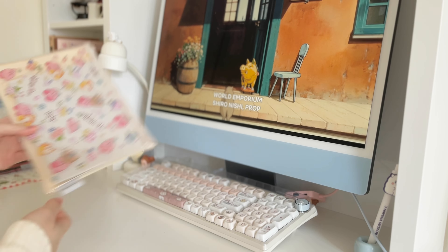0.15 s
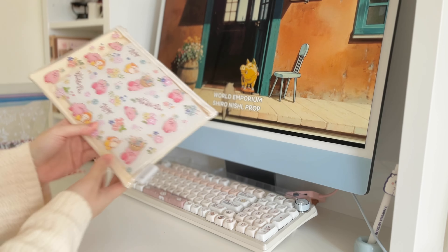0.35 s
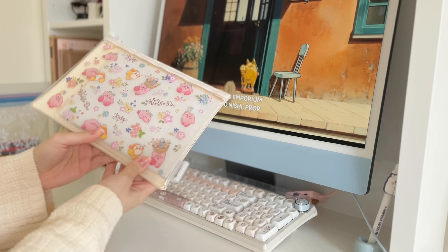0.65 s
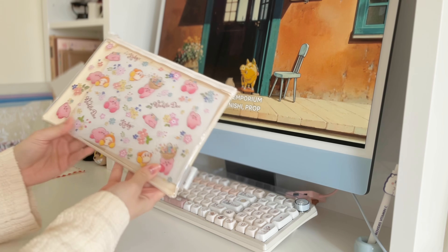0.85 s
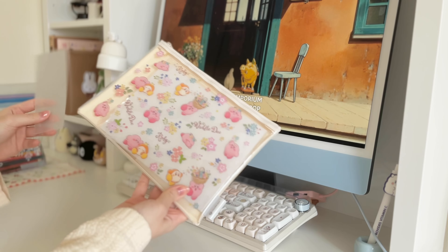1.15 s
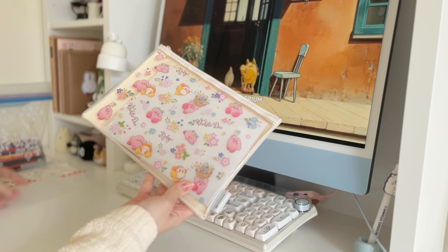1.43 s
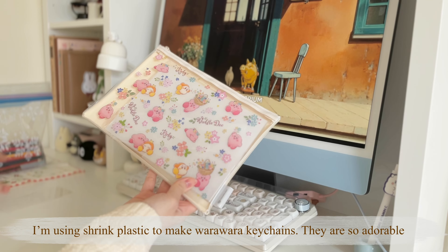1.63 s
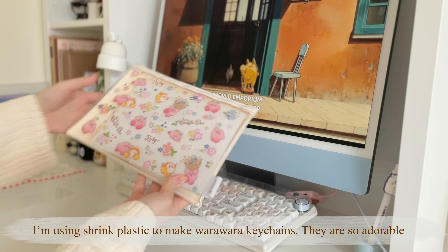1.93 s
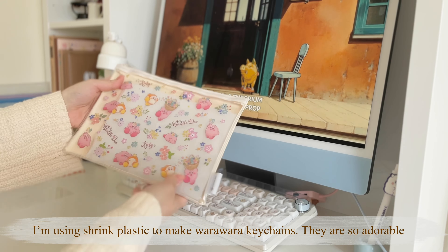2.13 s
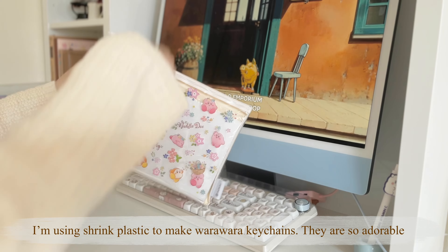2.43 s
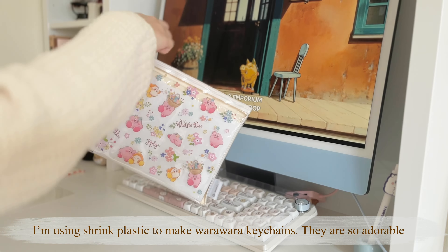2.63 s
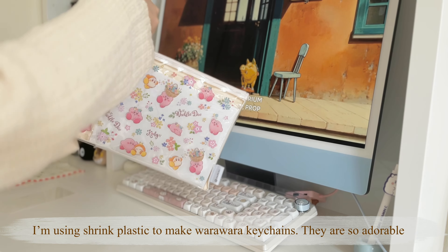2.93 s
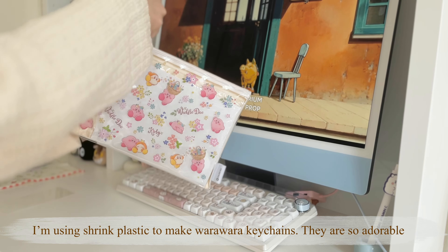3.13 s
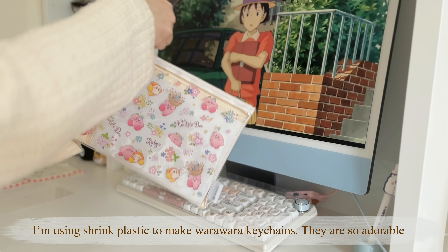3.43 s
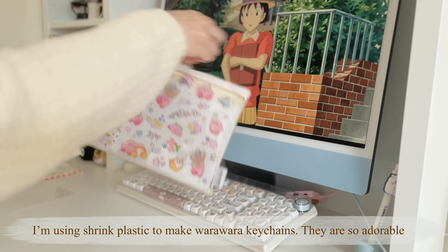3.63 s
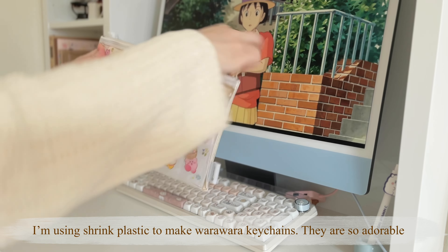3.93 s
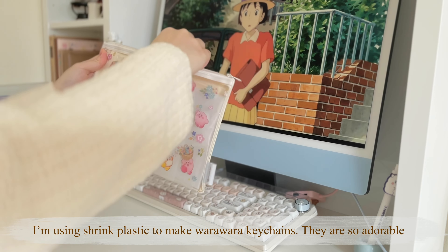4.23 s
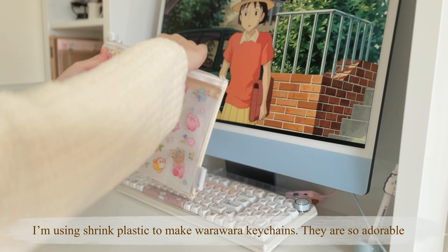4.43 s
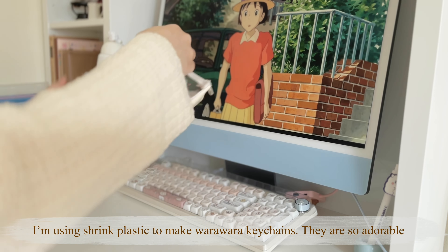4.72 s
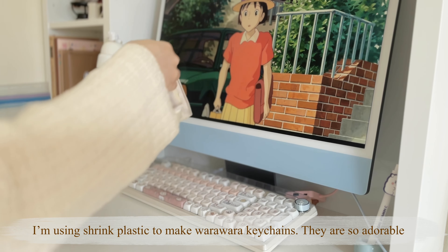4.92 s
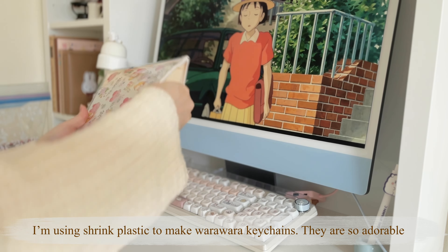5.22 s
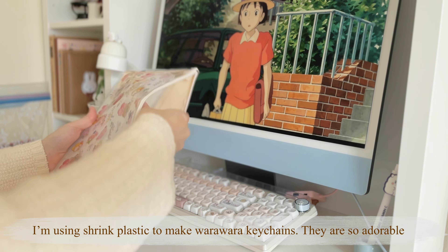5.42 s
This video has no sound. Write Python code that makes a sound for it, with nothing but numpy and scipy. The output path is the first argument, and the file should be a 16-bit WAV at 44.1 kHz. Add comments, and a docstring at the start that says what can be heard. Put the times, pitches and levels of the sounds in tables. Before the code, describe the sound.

A thin plastic zip pouch is handled close to the microphones in a small room with a faint low rumble and electrical hum. For the first second it rustles softly, with scattered crackles and light taps. At about 1.5 seconds a sharp crinkle and snap coincide with the dull knock of a card being put down. More crackling follows around 2 seconds, and at 2.4 a hollow thump, among the loudest sounds, rings briefly through the desk. Things go quieter, and the zip tab ticks near 3 seconds. From 3.3 to 3.8 the zip is pulled open, its rasping clicks speeding up into a short whine. From about 3.9 seconds the pouch is spread and a hand rummages inside, making irregular crinkles, small snaps, sliding hiss and soft dull knocks, busiest between 4.5 and 5.1. A last crisp crinkle comes at 5.5 seconds.

```python
"""A thin plastic zip pouch is handled: its film flexes, crinkles, slides and snaps as creases buckle.
The zip is pulled open, its tooth clicks fusing into a whine; the tab ticks and a hand rummages inside.
A card is put down with a dull knock, and a thump excites the modes of the desk.
A small room reverberates over faint rumble and mains hum; a close pair of microphone ports listens."""
import sys
import numpy as np
from scipy import signal
from scipy.fft import rfft, irfft, next_fast_len
from scipy.io import wavfile
from scipy.ndimage import map_coordinates

SR = 44100
rng = np.random.default_rng(int(sys.argv[2]) if len(sys.argv) > 2 else 0)


def unload_wav(signal):
    """Save mono or channel-first audio to the path in sys.argv[1] as 16-bit WAV at rate SR, clipped to [-1, 1]."""
    wavfile.write(
        sys.argv[1],
        SR,
        np.round(np.clip(np.atleast_2d(signal).T, -1, 1) * 32767).astype(np.int16),
    )


N = 245637
TOP_HZ = 15800  # band limit


def film(flex_db=-2, crinkle_db=-3.5, slide_db=-1, held_db=-104, clumps_per_s=70, clump_db=3):
    """Buckling and friction: bent film flexes dully and crinkles in clumps; sliding faces hiss."""
    # one face slides over another: (start [s], swell [s], hold [s], level [dB])
    slides = [(0.0, 0.005, 0.22, -79.5), (0.375, 0.1, .04, -73.5), (0.55, 0.082, 0.35, -60),
              (0.766, 0.021, 0.0072, -57.5), (0.983, 0.0086, 0.016, -50.5), (1.126, 0.018, 0.075, -74.5),
              (1.255, 0.028, 0.11, -82), (1.435, 0.02, 0.008, -53), (1.465, 0.004, 0.025, -52.5),
              (1.503, 0.0086, 0.045, -60.5), (1.986, 0.075, 0.098, -57.5), (2.617, 0.038, 0.13, -80),
              (2.78, 0.0037, 0.0055, -74), (2.993, .015, 0.0057, -75), (3.905, .008, 0.029, -69),
              (3.996, 0.011, 0.0071, -67), (4.033, .02, 0.057, -89), (4.212, .02, 0.087, -71),
              (4.472, 0.012, 0.054, -63.5), (4.586, .03, 0.13, -63), (4.926, 0.022, 0.049, -60),
              (5.05, 0.019, 0.067, -61.5), (5.266, 0.15, 0.077, -66.5), (5.505, 0.085, 0.0061, -45.5)]
    # spectra of the three sounds: (frequency [Hz], spectral density [dB])
    flex_spectrum = [(70, -40), (170, -2), (400, -9), (750, 0), (1200, 6), (1800, 6), (3500, -37)]
    crinkle_spectrum = [(500, -57), (1100, -19.5), (1800, 7.5), (2800, 10), (4000, 7), (5500, 7), (7000, 9),
                        (9000, -20), (13500, -7.5), (15800, -16.5)]
    slide_spectrum = [(2000, -1.5), (5000, 7.5), (7500, 4), (10000, 7), (12500, 9.5), (14000, 7.5),
                      (15800, -17)]
    crinkle, flex = bending() + amp(held_db)
    clumps = unit(amp(clump_db * wobble(clumps_per_s)))
    slide = sum(amp(db) * stroke(s, swell, hold, fall_db_per_s=291.5) for s, swell, hold, db in slides)
    low_grains = grains(per_s=1000, hz=760.5, spread=1.277, cycles=5.4, size_db=3)
    low_grains += .5 * rng.standard_normal(N)
    high_grains = grains(per_s=2000, hz=3660, spread=1.056, cycles=2.5, size_db=2)
    high_grains += .32 * friction(per_s=220, rough_db=10.5)
    flexing = amp(flex_db) * flex * np.sqrt(clumps) * coloured(low_grains, flex_spectrum)
    crinkling = amp(crinkle_db) * crinkle * clumps * coloured(high_grains, crinkle_spectrum)
    sliding = amp(slide_db) * slide * coloured(friction(per_s=500, rough_db=1.5), slide_spectrum)
    return flexing + crinkling + sliding


def bending():
    """Superposition: the grips of the hands add up to two envelopes, for crinkling and for flexing."""
    # (start [s], swell [s], hold [s], crinkle level [dB], flex level [dB])
    grips = [(0.0, 0.0032, 0.2, -69.5, -67), (0.293, 0.0086, 0.058, -73.5, -67),
             (0.406, 0.073, 0.03, -61, -61), (0.56, 0.021, 0.25, -61, -65),
             (0.783, 0.0097, 0.0063, -72, -73), (1.414, 0.026, .005, -45.5, -49),
             (1.462, 0.0034, 0.0064, -46, -84), (1.495, 0.0074, 0.023, -63, -72),
             (1.983, 0.093, 0.072, -52.5, -55.5), (2.61, 0.012, 0.18, -73.5, -68.5),
             (3.895, 0.018, 0.039, -56.5, -62), (3.989, 0.019, 0.17, -72.5, -66.5),
             (4.21, 0.028, 0.064, -57, -58), (4.435, 0.064, 0.16, -56, -60),
             (4.616, 0.033, 0.053, -56.5, -58.5), (4.78, 0.009, 0.018, -67, -61.5),
             (4.923, 0.02, 0.019, -52.5, -55.5), (5.025, 0.059, 0.057, -52, -59),
             (5.244, 0.058, 0.14, -61.5, -61), (5.499, 0.062, 0.0031, -44, -51.5)]
    return sum(amp([[crinkle_db], [flex_db]]) * stroke(s, swell, hold, fall_db_per_s=173)
               for s, swell, hold, crinkle_db, flex_db in grips)


def grains(per_s, hz, spread, cycles, size_db):
    """Shot noise: tiny creases ring as damped sines of random onset, pitch and size; rms 1."""
    start, pitch, size = rng.random((int(per_s * N / SR), 3)).T
    ring_hz = np.clip(hz * np.exp(spread * (2 * pitch - 1)), 200, TOP_HZ)[:, None]
    age = np.arange(256)  # samples
    periods = ring_hz * age / SR
    strength = amp(size_db * np.minimum(-np.log(1 - size), 4))[:, None]
    waves = strength * np.sin(2 * np.pi * periods) * np.exp(-periods / cycles)
    positions = (start * N).astype(int)[:, None] + age
    return unit(np.bincount(positions.ravel(), waves.ravel(), N)[:N])


def snaps(ring_db=-4, flick_db=-4, crack_db=7, flutter_db=-14, flick_t60=.005):
    """Snap-through buckling: a crease cracks, its facet flicks and rings, the sheet around flutters."""
    # the main snaps, mostly creases; those at 2.3569 and 2.3825 s are clicks of the thump on the desk: (time
    # [s], level [dB], ring frequency [Hz], relative treble [dB])
    main_creases = [(0.0607, -45.5, 3000, -10), (0.1446, -48, 2900, -15), (0.1604, -46, 1800, -9.5),
                    (0.3006, -48.5, 1520, -7.5), (0.4333, -48, 2690, -5.5), (0.4807, -41, 3730, -12),
                    (0.578, -52.5, 2700, -15), (1.182, -58.5, 2800, -17), (1.4186, -46, 2230, -3.5),
                    (1.436, -41, 1740, -9.5), (1.447, -38, 1650, -12.5), (1.4703, -25.5, 4700, -6.5),
                    (1.4894, -28.5, 3420, -19), (1.6604, -51, 2600, -21), (1.8955, -54, 2690, -30),
                    (1.9963, -41, 2010, -11), (2.0177, -40.5, 3460, -15), (2.0517, -36.5, 1900, -21.5),
                    (2.0646, -37.5, 2600, -24.5), (2.073, -37.5, 4200, -18.5), (2.082, -34.5, 3280, -17.5),
                    (2.1045, -28.5, 1990, -30.5), (2.126, -36, 2600, -23.5), (2.148, -53.5, 2600, -11),
                    (2.1749, -41, 2100, -20), (2.2557, -37.5, 4870, -19), (2.3569, -33, 2030, -19),
                    (2.371, -40.5, 1910, -11), (2.3825, -29, 1750, -22), (2.4344, -39.5, 1520, -21.5),
                    (2.596, -50, 2560, -24), (2.6285, -48.5, 1870, -12), (2.6728, -53, 2060, -19),
                    (2.701, -61, 2100, -24), (2.789, -51.5, 2290, -8), (3.3347, -48.5, 2330, -4.5),
                    (3.3545, -43, 1530, -13), (3.4785, -61, 1690, -23), (3.7588, -32, 1420, -16.5),
                    (3.8766, -46.5, 3080, -23), (3.9079, -45, 3160, -21), (3.921, -41.5, 2800, -18),
                    (3.9344, -44.5, 1880, -17), (4.0138, -45, 1900, -13.5), (4.15, -41.5, 2000, -36),
                    (4.2314, -45.5, 1910, -14), (4.2382, -42, 1930, -16), (4.2814, -42.5, 2440, -12),
                    (4.4482, -46, 2860, -32), (4.4574, -48, 2780, -24), (4.4926, -40.5, 2700, -9.5),
                    (4.507, -44, 2500, -16.5), (4.5396, -50, 1860, -10), (4.552, -35.5, 1640, -19),
                    (4.5955, -46, 4900, -5.5), (4.6233, -37, 2900, -6), (4.7091, -36.5, 2580, 1),
                    (4.7434, -44, 2520, -19), (4.8054, -48.5, 3160, -2), (4.8119, -40, 1820, -8),
                    (4.8414, -48.5, 2000, -10), (4.9277, -46.5, 2430, -10.5), (5.0355, -41.5, 2220, -6),
                    (5.0775, -32.5, 2450, -8.5), (5.082, -42, 2010, -14), (5.0945, -34, 1870, -4.5),
                    (5.121, -47, 1870, -16), (5.1644, -52, 2000, -2), (5.1744, -49.5, 3240, -7),
                    (5.2648, -43.5, 2010, -13.5), (5.2739, -46, 2150, -21), (5.319, -51, 2600, -10),
                    (5.3981, -46, 2600, -11), (5.5069, -36.5, 1840, -11.5), (5.5505, -32.5, 2700, -8.5)]
    out = np.zeros(N)
    for s, db, hz, treble_db in list(main_creases) + lesser_creases():
        flick = amp(flick_db) * ringing([(hz, 0, flick_t60), (1.544 * hz, -4, flick_t60)])
        # the ring builds up as the crease runs across the facet
        ring = amp(ring_db) * burst(t60=.029, hz=hz, width_hz=.55 * hz, rise_s=.0008)
        crack = amp(crack_db + treble_db) * burst(t60=.016, hz=9900, width_hz=7300)
        flutter = amp(flutter_db) * burst(t60=.011, hz=805, width_hz=1200)
        add(out, s, amp(db) * (ring + crack + flutter))
        add(out, s, amp(db) * flick)
    return out


def lesser_creases(per_s=12, over_crinkle_db=6, knee_db=-46, scatter_db=3.5, centre_hz=2370, spread=.57):
    """Random buckling: rows of further snaps, stronger the harder the pouch is bent, up to a knee."""
    crinkle = bending()[0]
    rows = []
    for when, size, pitch, dullness in rng.random((int(per_s * N / SR), 4)):
        crinkle_db = 20 * np.log10(crinkle[int(when * N)] + 1e-9)
        db = min(crinkle_db + over_crinkle_db, knee_db) + scatter_db * (2 * size - 1)
        hz = centre_hz * np.exp(spread * (2 * pitch - 1))
        rows.append((when * N / SR, db, hz, -27 * dullness))
    return rows


def zipper(rattle_db=-6.5, rasp_db=-9.5, ring_db=-.5, jitter=.016, full_speed_hz=1000, rasp_from_hz=510):
    """Periodic excitation: teeth scrape through the slider and, as it runs freely, fuse into a whine."""
    # the slider's run: (time [s], tooth rate [Hz], whine's share of the power [0-1])
    run = [(3.35, 180, 0), (3.41, 210, 0), (3.48, 140, 0), (3.525, 200, 0), (3.545, 620, .25),
           (3.57, 920, .15), (3.598, 945, .25), (3.615, 1030, .4), (3.632, 1050, .5), (3.65, 1070, .9),
           (3.68, 930, .92), (3.70, 855, .78), (3.725, 790, .6), (3.75, 760, .05)]
    # pulls on the slider: (start [s], swell [s], hold [s], level [dB])
    pulls = [(3.344, 0.021, 0.021, -38), (3.475, 0.0078, 0.11, -39.5), (3.598, 0.0045, 0.012, -44),
             (3.62, 0.028, 0.054, -36.5), (3.752, 0.0039, 0.0054, -48.5)]
    # the pouch opens: (time [s], opening [0-1])
    gape = [(3.55, 0), (3.76, 1)]
    # resonances of slider, shut pouch and open pouch: (frequency [Hz], bandwidth [Hz], level [dB])
    slider_modes = [(242, 180, -3.5), (580, 86, 4.5), (1100, 215, 3.5), (1746, 265, 11), (2330, 390, 0.5),
                    (3750, 570, -31)]
    shut_modes = [(1740, 110, 0)]
    open_modes = [(1650, 100, 0)]
    # the teeth's rasp: (frequency [Hz], spectral density [dB])
    rasp_spectrum = [(2000, -9), (3500, 8.5), (5000, 6.5), (6500, 5.5), (8500, -3), (12000, 3),
                     (15800, -8.5)]
    speed, fused = curves(run)
    opening, = curves(gape)
    pull = sum(amp(db) * stroke(s, swell, hold, fall_db_per_s=355) for s, swell, hold, db in pulls)
    pull *= (speed / full_speed_hz) ** .17  # faster is louder
    teeth_passed = np.cumsum(speed * (1 + jitter * wobble(300))) / SR
    # each tooth gives a short scrape as it enters the slider
    scrapes = unit(friction(per_s=500, rough_db=-1) * np.exp(-4 * (teeth_passed % 1)))
    pouch_ring = (1 - opening) * unit(resonate(scrapes, shut_modes))
    pouch_ring += opening * unit(resonate(scrapes, open_modes))
    rattle = amp(rattle_db) * unit(unit(resonate(scrapes, slider_modes)) + amp(ring_db) * pouch_ring)
    rasp = amp(rasp_db) * coloured(scrapes, rasp_spectrum) / (1 + (rasp_from_hz / speed) ** 4)
    return pull * (np.sqrt(1 - fused) * rattle + np.sqrt(fused) * whine(speed, teeth_passed) + rasp)


def whine(speed, teeth_passed, scatter_periods=.04, flutter_db=2.3):
    """Harmonic series of the tooth rate; uneven teeth modulate the phase, blurring high orders most."""
    # spectral envelope of the harmonics: (frequency [Hz], level [dB])
    formants = [(600, -4), (800, 1.5), (1000, 1), (1750, 5.5), (2100, 1), (2550, -9), (2900, -1), (3150, 3),
                (3500, -2), (3800, -14), (4150, -8), (4600, -20)]
    orders = np.arange(1, 6)[:, None]
    periods = orders * (teeth_passed + scatter_periods * np.array([wobble(500) for _ in orders]))
    flutter = flutter_db * np.array([wobble(90) for _ in orders])
    strength = amp(along(formants, orders * speed) + flutter)
    harmonics = strength * np.sin(2 * np.pi * periods)
    return np.sqrt(2) * harmonics.sum(0) / np.linalg.norm(strength, axis=0)


def pull_tab(ring_db=-3, scuff_db=3, tick_db=-8, ping_hz=6200, ping_t60=.056):
    """Free vibration: the tab ticks, scuffs and rings on the slider, and pings when it swings free."""
    # clicks on the slider and free swings: (time [s], level [dB])
    clicks = [(2.93, -67.5), (3.0142, -49.5), (3.289, -69), (3.7603, -72)]
    pings = [(2.617, -61), (3.972, -56.5)]
    # (frequency [Hz], level [dB], t60 [s])
    tab_modes = [(1450, -5, 0.018), (1820, 11, 0.012), (1970, -10, 0.022), (2160, -6, 0.022),
                 (3130, -14, 0.025), (5140, -15, 0.021)]
    out = np.zeros(N)
    for s, db in clicks:
        add(out, s, amp(db + ring_db) * ringing(tab_modes))
        scuff = amp(scuff_db) * burst(t60=.059, hz=1670, width_hz=550, rise_s=.0045)
        tick = amp(tick_db) * burst(t60=.03, hz=11200, width_hz=10200)
        add(out, s, amp(db) * (scuff + tick))
    for s, db in pings:
        add(out, s, amp(db) * ringing([(ping_hz, 0, ping_t60)]))
    return out


def desk_thump(attack_s=.0022, boom_rise_s=.056, rattle_db=-10):
    """Modal response to impact: the desk rings and what lies on it rattles; long contact is duller."""
    # (time [s], level [dB], contact time [s])
    blows = [(2.3575, -41.5, 0.00011), (2.362, -23.5, 0.00051), (2.3824, -33, 0.000034)]
    # modes of the laden top and of the whole desk's sway: (frequency [Hz], level [dB], t60 [s])
    top_modes = [(244, -2.5, 0.077), (435, -18, 0.2), (520, -12.5, 0.13), (534.8, 2, .165), (573, 6, 0.054),
                 (611, -2, 0.097), (667, -3.5, 0.18), (760, -9, 0.22), (809, -10, 0.15), (933, 0, 0.049),
                 (1035, -5, 0.072), (1167, -1, 0.042), (1810, 2.5, 0.02), (2190, -1, 0.015),
                 (2870, -7, 0.016)]
    sway_modes = [(96.6, -9, 0.2), (132.5, 3.5, 0.23)]
    out, t = np.zeros(N), np.arange(SR // 2) / SR
    for s, db, contact_s in blows:
        response = ringing(top_modes) * (1 - np.exp(-t / attack_s))
        response += ringing(sway_modes) * (1 - np.exp(-(t / boom_rise_s) ** 2))
        add(response, 0, amp(rattle_db) * burst(t60=.43, hz=580, width_hz=1080))
        force = t * np.exp(-4 * t / contact_s)
        add(out, s, amp(db) * signal.fftconvolve(response, force / force.sum())[:len(t)])
    return out


def bumps(t60_at_500_hz=.058, relative_width=.43):
    """Damped impact: card, fingers and pouch give dull knocks, of which the lower last longer."""
    # (time [s], level [dB], frequency [Hz])
    contacts = [(.484, -51, 710), (.704, -41, 900), (.8294, -44, 1020), (1.449, -42.5, 417),
                (1.4545, -30.5, 350), (1.46, -38.5, 219), (1.475, -42.5, 128), (1.479, -49, 308),
                (2.957, -48, 720), (4.149, -48.5, 703), (4.552, -41, 980), (4.66, -41, 640),
                (4.672, -43, 790), (4.699, -47, 482), (4.809, -43, 680), (4.929, -43.5, 685),
                (4.94, -42, 161), (4.949, -42, 86.5), (4.975, -37.5, 604), (5.0, -44.5, 700),
                (5.019, -43, 640), (4.985, -43, 224), (5.505, -41, 760)]
    out = np.zeros(N)
    for s, db, hz in contacts:
        t60 = t60_at_500_hz * (500 / hz) ** .32
        add(out, s, amp(db) * burst(t60, hz, relative_width * hz))
    return out


def room(x, t60_scale=1, delay_s=.004):
    """Diffuse reverberation: each port gets a decaying tail, coherent with the other only in the bass."""
    # (frequency [Hz], t60 [s])
    decay_times = [(100, 0.63), (300, 0.42), (800, 0.46), (2000, 0.32), (5000, 0.15), (14000, 0.18)]
    hz, t, noise = signal.stft(rng.standard_normal((2, SR // 2)), SR, nperseg=256)
    angle = np.clip(hz / 500, 0, 1)[:, None] * np.pi / 4
    mid, side = np.cos(angle) * noise[0], np.sin(angle) * noise[1]
    decay = amp(-60 * t / (t60_scale * along(decay_times, hz)[:, None]))
    tail = signal.istft(np.array([mid + side, mid - side]) * decay, SR, nperseg=256)[1]
    delayed = np.pad(x, (int(delay_s * SR), 0))[None]
    return signal.fftconvolve(delayed, tail / np.linalg.norm(tail[0]), axes=1)[:, :N]


def background(rumble_db=-59.5, apart_hz=600):
    """Spatial coherence: mains hum and long waves of room noise reach both ports alike, short ones not."""
    # mains harmonics: (frequency [Hz], level [dB])
    hum_tones = [(60, -86.5), (120, -63.5)]
    # (frequency [Hz], spectral density [dB])
    rumble_spectrum = [(20, -8.5), (35, -5), (49, 10), (62, 15), (75, -5), (105, 5), (160, -6.5),
                       (300, -14.5), (550, -14.5), (1000, -20.5), (2000, -35.5), (5000, -50.5),
                       (15000, -55)]
    t = np.arange(N) / SR
    hum = sum(amp(db) * np.sqrt(2) * np.sin(2 * np.pi * (hz * t + rng.random())) for hz, db in hum_tones)
    common = rng.standard_normal(N)
    separate = filtered(rng.standard_normal((2, N)), lambda hz: np.minimum(hz / apart_hz, 2))
    return hum + amp(rumble_db) * coloured(common + separate, rumble_spectrum)


def ports(pair):
    """Level and phase differences set the ports apart, with antiphase in part of the treble."""
    # (frequency [Hz], left over right [dB])
    balance = [(150, 1), (500, 3), (1300, -1), (2400, 5.5), (4500, 7.5), (6300, 10), (7500, -0.5)]
    # (frequency [Hz], phase lead of the left [rad])
    lead = [(100, 0), (500, .3), (1400, 1.7), (2000, .6), (4200, .9), (6200, -.8), (8300, -3.14),
            (11300, -6.2), (13000, -6.4), (15000, -9.3)]
    side = np.array([[.5], [-.5]])
    return filtered(pair, lambda hz: amp(side * along(balance, hz)) * np.exp(1j * side * along(lead, hz)))


def stroke(start, swell, hold, fall_db_per_s, onset_s=.006, swell_db=10.5):
    """Envelope of one move of the hand: it sets in, swells, holds and decays exponentially."""
    t = np.arange(N) / SR - start
    db = swell_db * np.clip(t / swell - 1, -1, 0) - fall_db_per_s * np.maximum(t - swell - hold, 0)
    return np.clip(t / onset_s, 0, 1) * amp(db)


def friction(per_s, rough_db):
    """Stick-slip: noise whose strength jumps as the surfaces catch and let go."""
    return rng.standard_normal(N) * amp(rough_db * wobble(per_s))


def ringing(modes):
    """Free decay of modes (frequency [Hz], level [dB], t60 [s]), each at a slightly random strength."""
    t = np.arange(SR // 2) / SR
    return sum(amp(db + rng.normal(0, 1) - 60 * t / t60) * np.sin(2 * np.pi * hz * t)
               for hz, db, t60 in modes)


def burst(t60, hz, width_hz, rise_s=0):
    """Transient excitation: a dying puff of noise, band-passed twice about one frequency; peak 1."""
    t = np.arange(SR // 3) / SR
    envelope = amp(-60 * t / t60) * np.minimum((t + 1 / SR) / (rise_s + 1 / SR), 1)
    x = resonate(rng.standard_normal(len(t)) * envelope, [(hz, width_hz, 0)])
    x = resonate(x, [(hz, 2 * width_hz, 0)])
    return x / np.abs(x).max()


def resonate(x, modes):
    """Forced response of resonators (frequency [Hz], bandwidth [Hz], level [dB]) of alternating sign."""
    return filtered(x, lambda f: sum((-1) ** k * amp(db) * 1j * f * bw / (hz * hz - f * f + 1j * f * bw)
                                     for k, (hz, bw, db) in enumerate(modes)))


def coloured(x, spectrum):
    """Spectral shaping by (frequency [Hz], level [dB]) points; rms 1."""
    return unit(filtered(x, lambda hz: amp(along(spectrum, hz))))


def filtered(x, response):
    """Linear filtering: the spectrum of x times a complex frequency response."""
    n = x.shape[-1]
    padded = next_fast_len(n + 8192)
    return irfft(rfft(x, padded) * response(np.fft.rfftfreq(padded, 1 / SR)), padded)[..., :n]


def wobble(per_s):
    """A smooth random curve with per_s knots a second."""
    return map_coordinates(rng.standard_normal(int(N * per_s / SR) + 4), [np.arange(N) * per_s / SR])


def curves(rows):
    """Each column after the time, interpolated to one value per sample."""
    times, *columns = np.transpose(rows)
    return [np.interp(np.arange(N) / SR, times, column) for column in columns]


def along(points, hz):
    """(frequency [Hz], value) points interpolated on a logarithmic frequency axis."""
    knots_hz, values = np.transpose(points)
    return np.interp(np.log(hz + 1), np.log(knots_hz + 1), values)


def add(track, s, x):
    """Mix x into the track at s seconds."""
    part = track[round(s * SR):][:len(x)]
    part += x[:len(part)]


def amp(db):
    """Decibels to gain."""
    return 10 ** (np.asarray(db) / 20)


def unit(x):
    """Scale to rms 1."""
    return x / np.sqrt(np.mean(x ** 2) + 1e-20)


def scene(film_room_db=-4, snap_room_db=-9, zip_room_db=-6, desk_room_db=-10, bump_room_db=-6):
    """Direct and reverberant fields add at the ports; sounds on the desk have a shorter tail."""
    rustle, cracks = film(), snaps()
    slider = zipper() + pull_tab()
    thump, knocks = desk_thump(), bumps()
    pouch_tail = room(amp(film_room_db) * rustle + amp(snap_room_db) * cracks + amp(zip_room_db) * slider)
    desk_tail = room(amp(desk_room_db) * thump + amp(bump_room_db) * knocks, t60_scale=.7)
    return ports(rustle + cracks + slider + thump + knocks + pouch_tail + desk_tail + background())


def record(dry):
    """An ideal low-pass filter removes everything above the band limit."""
    return filtered(dry, lambda hz: hz < TOP_HZ)


dry = scene()
out = record(dry)
unload_wav(out)
```